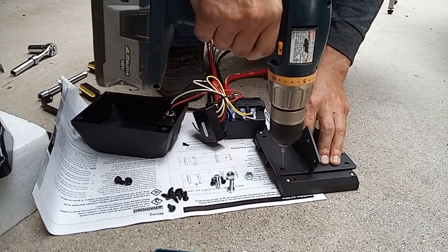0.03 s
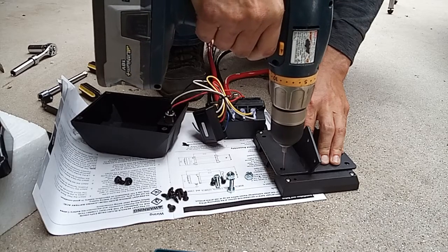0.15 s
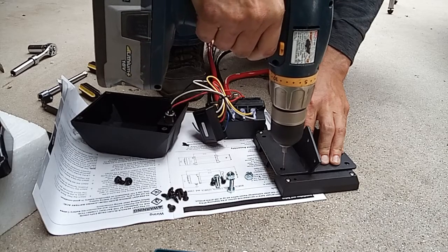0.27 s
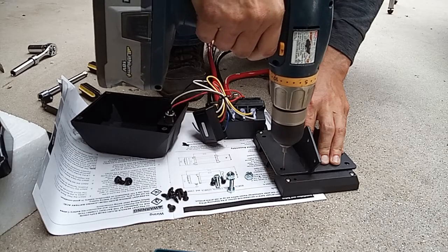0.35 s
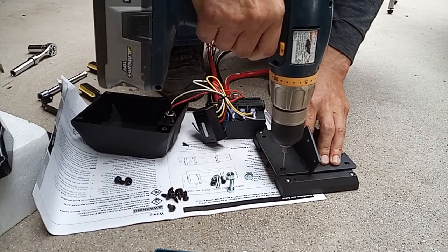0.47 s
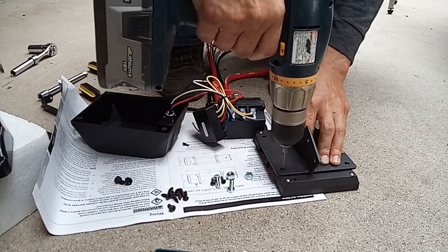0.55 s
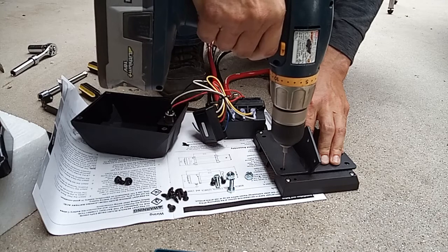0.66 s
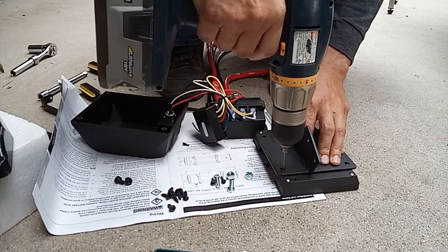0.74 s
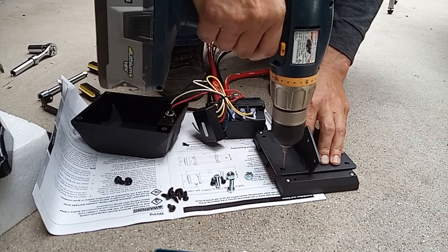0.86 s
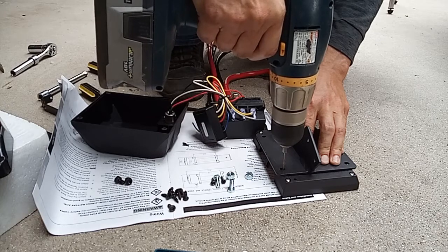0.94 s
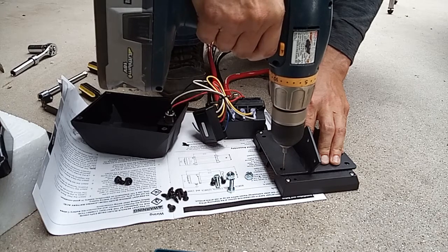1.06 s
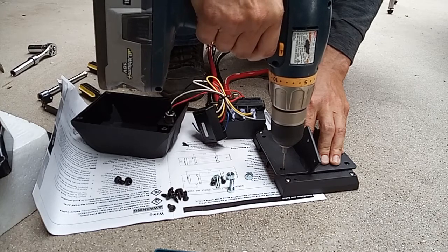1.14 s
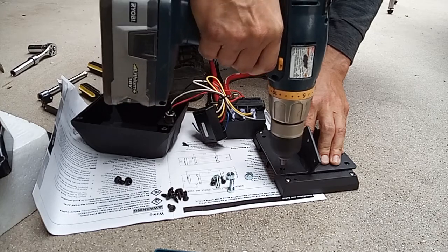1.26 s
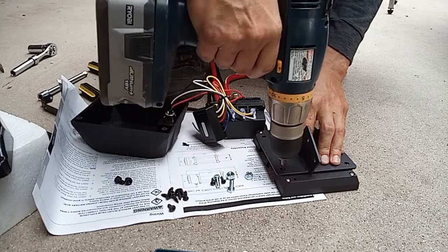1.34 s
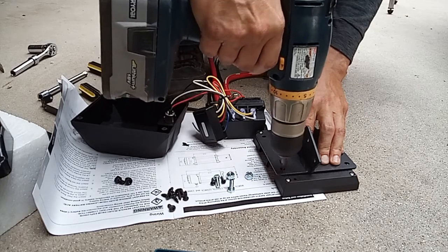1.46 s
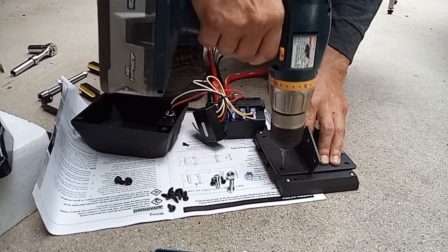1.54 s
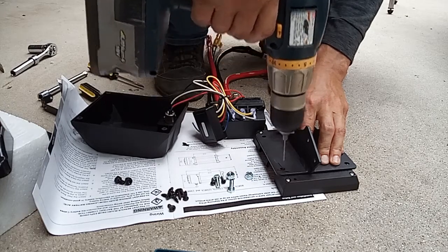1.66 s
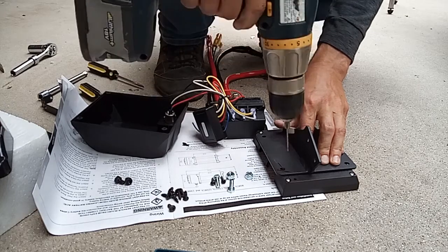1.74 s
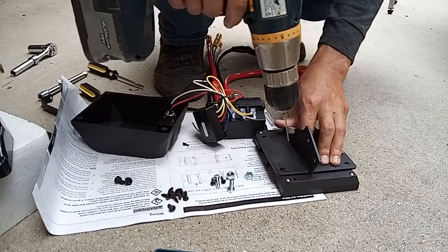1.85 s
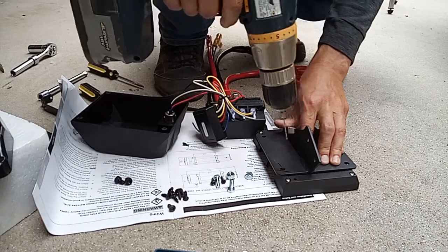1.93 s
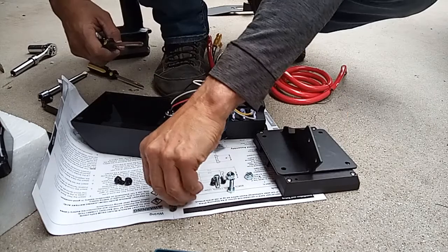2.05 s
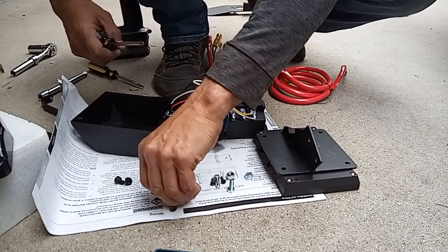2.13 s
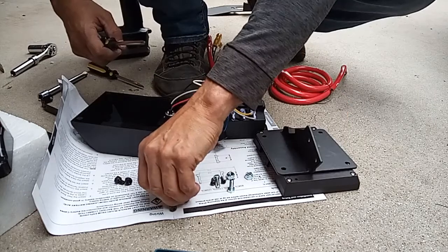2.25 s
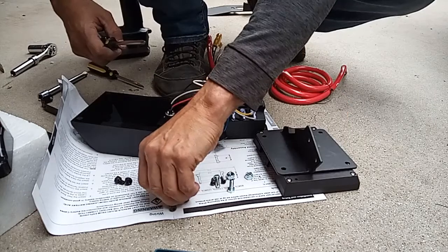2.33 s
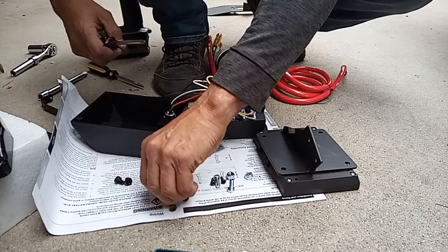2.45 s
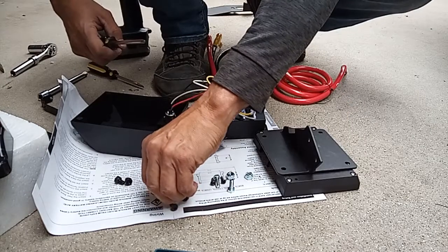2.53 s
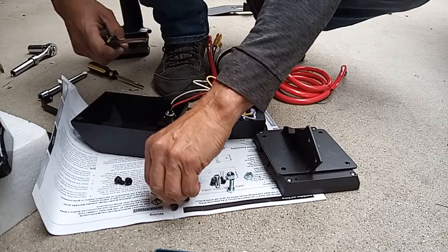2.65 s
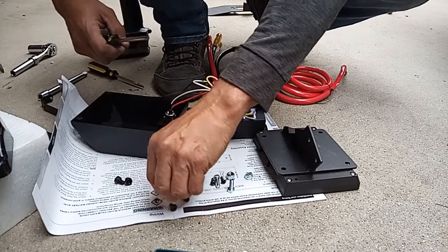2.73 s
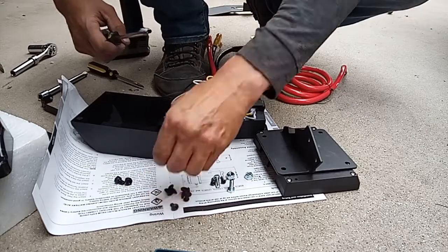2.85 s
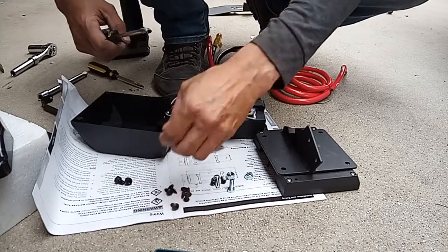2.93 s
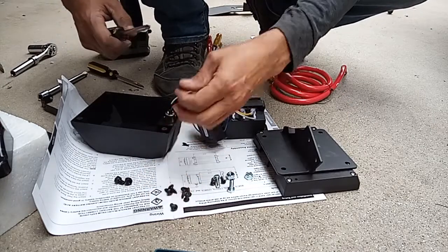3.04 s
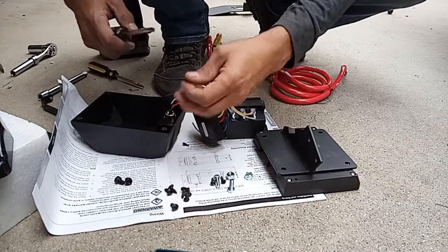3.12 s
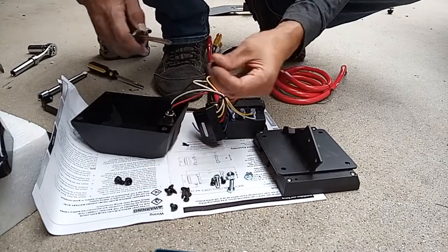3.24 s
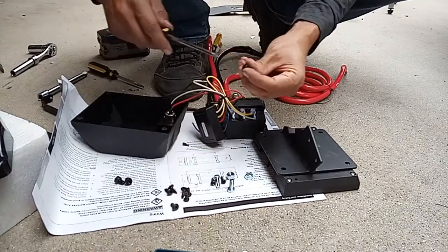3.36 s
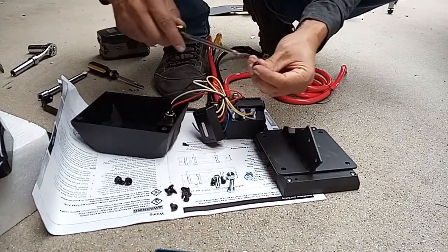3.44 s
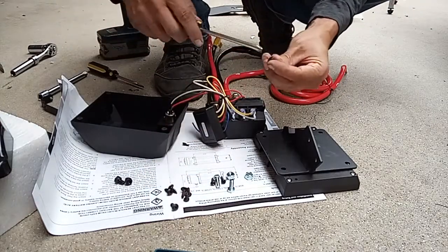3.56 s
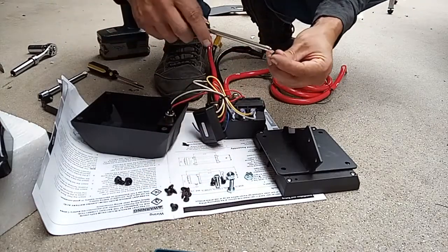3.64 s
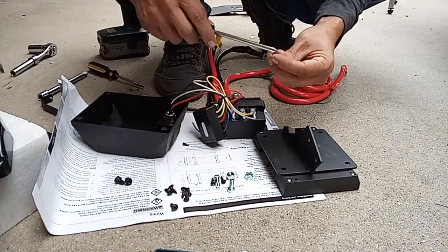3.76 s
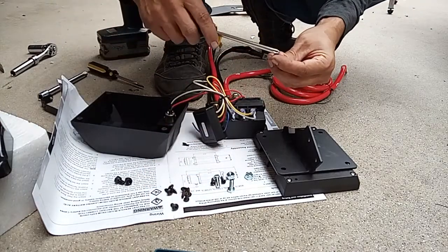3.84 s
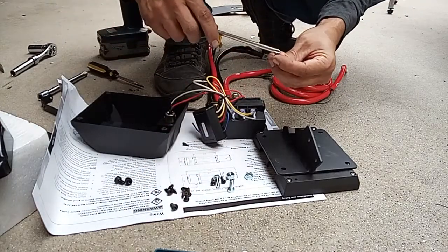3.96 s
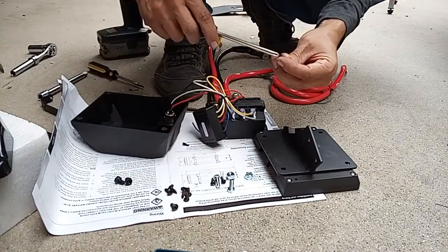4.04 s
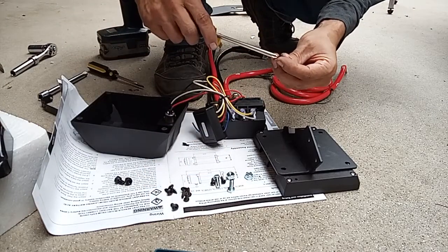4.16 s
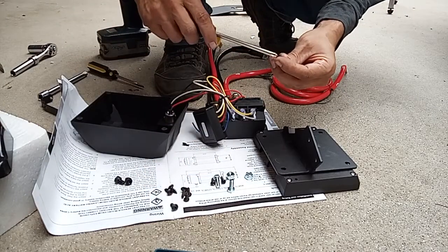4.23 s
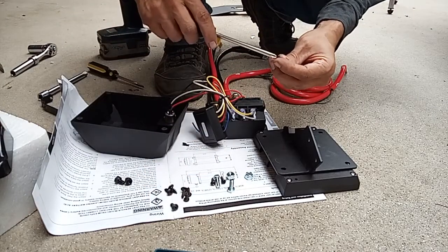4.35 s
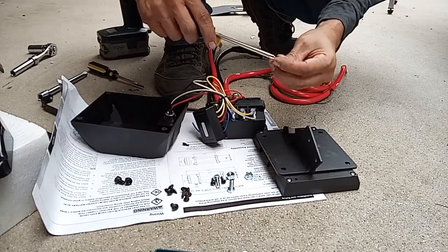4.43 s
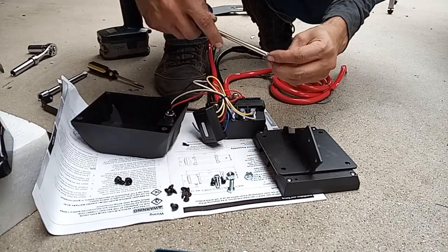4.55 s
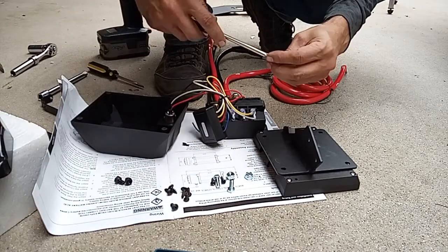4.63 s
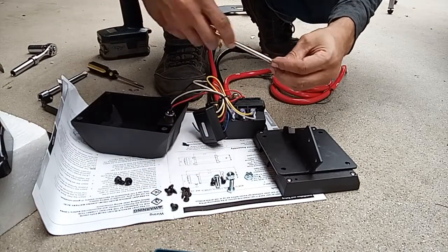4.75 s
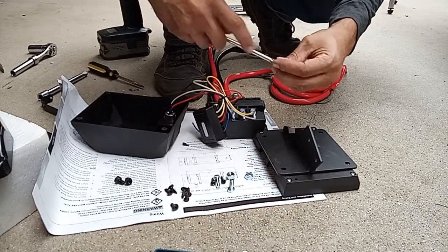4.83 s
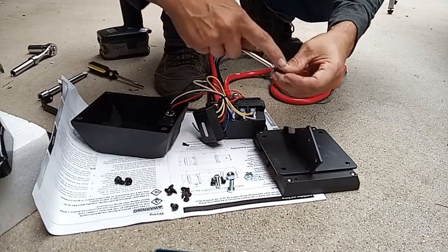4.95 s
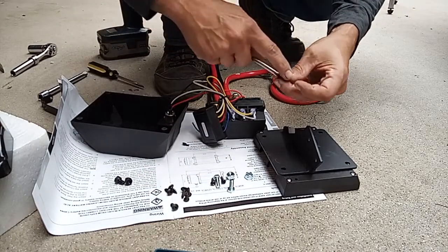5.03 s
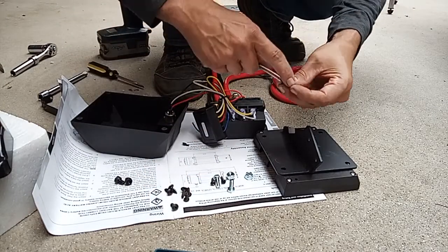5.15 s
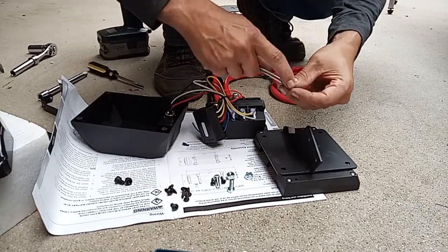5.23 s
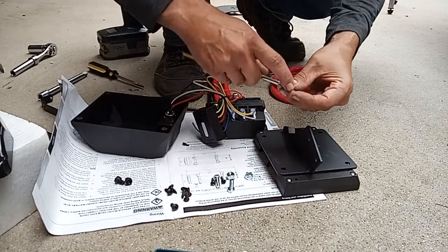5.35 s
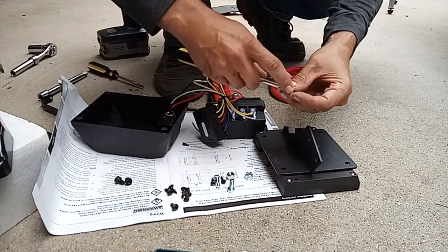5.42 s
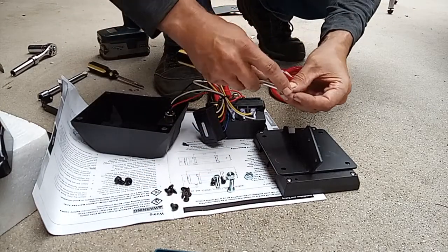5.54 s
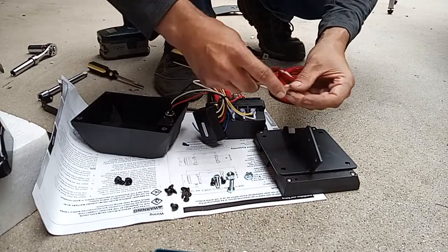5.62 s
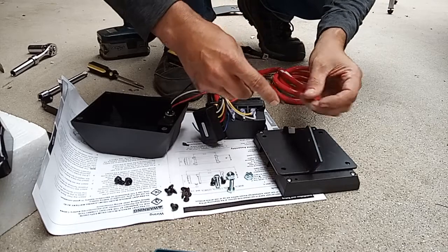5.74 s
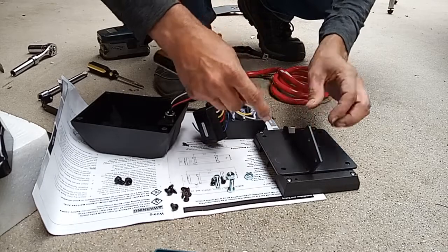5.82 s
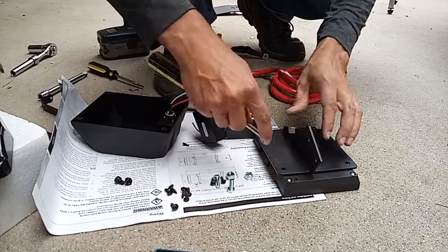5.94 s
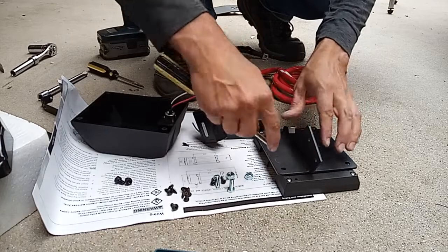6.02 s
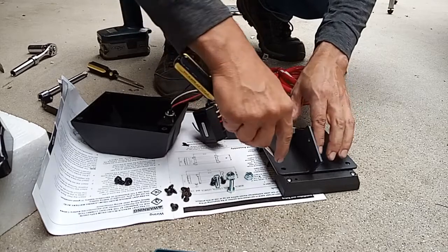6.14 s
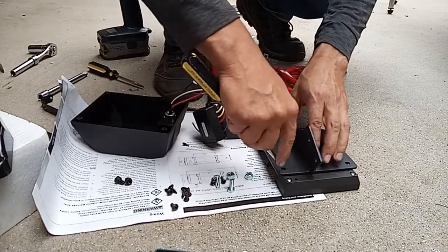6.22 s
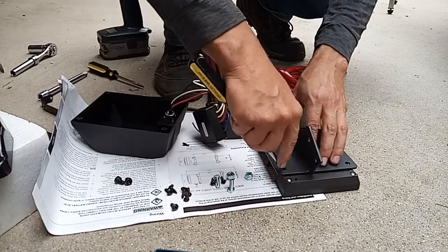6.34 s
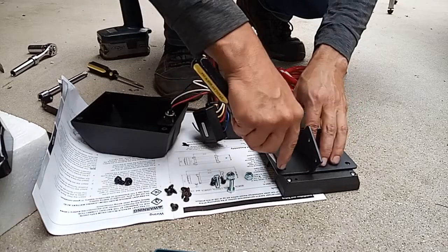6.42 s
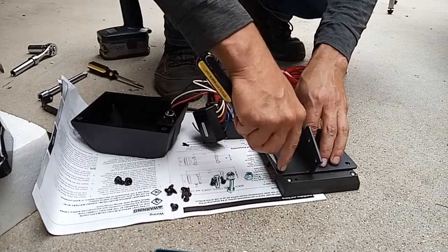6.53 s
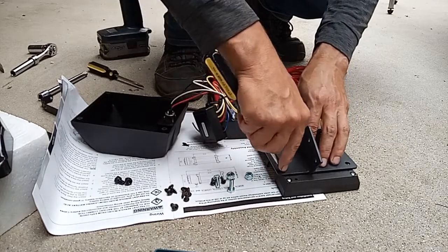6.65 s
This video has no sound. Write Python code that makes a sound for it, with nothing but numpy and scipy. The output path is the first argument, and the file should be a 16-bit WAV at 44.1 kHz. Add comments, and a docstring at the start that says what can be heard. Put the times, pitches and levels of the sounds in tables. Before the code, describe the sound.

A cordless drill is already running close to the microphone, its harsh whine rising as it bores metal with thin squeals. It snags, speeds up briefly, then stops dead with a sharp clack and tiny chuck rattle. Afterwards it is much quieter outdoors: birds chirp, distant traffic rumbles, and small steel parts tick in the hands.

```python
"""A cordless drill bores into a metal bracket on a concrete patio, close to a mono microphone.
Its motor whines on multiples of the shaft speed over coloured noise from fan and brushes.
The bit squeals in gliding sine tones; noise bursts make the clack of the stop and a short rattle.
Then small metal parts tick in the hands as ringing modes and rub as grainy noise.
Outdoors, birds sing in sliding tones; rumble, traffic and a hollow wandering band are shaped noise."""
import sys
import numpy as np
from scipy import signal
from scipy.fft import rfft, irfft, next_fast_len
from scipy.io import wavfile
from scipy.ndimage import uniform_filter1d

SR = 44100
rng = np.random.default_rng(int(sys.argv[2]) if len(sys.argv) > 2 else 0)


def transcribe(u):
    """Save the signal u as a 16-bit wav file named by the first command-line argument.

    u: samples, shape (n,) or (channels, n), limited to [-1, 1]; the rate is SR.
    q: integer samples, one column per channel.
    """
    v = np.clip(np.atleast_2d(u).T, -1, 1)
    q = np.round(v * 32767).astype(np.int16)
    wavfile.write(sys.argv[1], SR, q)


N = 294791
T = np.arange(N) / SR  # time in s

# colour of the rushing air and brushes, which the housing also gives the overtones: [f/Hz, level/dB]
HOUSING_COLOUR = [(40, -26.5), (200, -10), (400, -13), (520, 3.5), (700, 8), (1050, 8), (1300, 3.5),
                  (1450, 7), (1900, 7), (2300, 3), (2600, 8), (3300, 1), (4100, 8.5), (4700, 4), (5500, 5),
                  (6600, 9), (8100, 0), (10300, 8.5), (11500, 8), (12700, 4), (13800, -0.5), (14700, 7),
                  (15500, -5)]
CRUISE_HZ = 205  # shaft speed at which the motor's levels are set
BREAKTHROUGH_S = 1.196  # the bit snags as it breaks through
COMMUTATOR_ORDER = 5  # segments per turn of the shaft


def undb(db):
    """Decibels to gain."""
    return 10 ** (np.asarray(db) / 20)


def unit(x):
    """Scale to rms 1."""
    return x / np.sqrt(np.mean(x ** 2))


def curves(table):
    """The columns of a table, joined by straight lines in time."""
    s, *columns = np.transpose(table)
    return [np.interp(T, s, c) for c in columns]


def colour(x, points):
    """Filter by a spectrum of [f/Hz, level/dB] points; rms 1."""
    hz, db = np.transpose(points)
    size = next_fast_len(len(x))
    bins = np.maximum(np.arange(size // 2 + 1) * SR / size, 1)
    gain = undb(np.interp(np.log(bins), np.log(hz), db))
    return unit(irfft(rfft(x, size) * gain, size)[:len(x)])


def noise(points):
    """Coloured noise of rms 1."""
    return colour(rng.standard_normal(N), points)


def lowpass(x, hz):
    """Second-order treble roll-off."""
    return signal.sosfilt(signal.butter(2, min(hz, .45 * SR), fs=SR, output="sos"), x)


def walk(rate):
    """Chance values, about `rate` a second, joined by straight lines; rms 1."""
    k = max(int(SR / rate), 1)
    steps = np.repeat(rng.standard_normal(N // k + 1), k)
    return unit(uniform_filter1d(steps, k)[:N])


def add(out, s, x):
    """Mix a sound in at time s."""
    i = int(s * SR)
    x, i = x[max(-i, 0):], max(i, 0)
    out[i:i + len(x)] += x[:N - i]


def echoes(x, t60, treble_t60, wet_db, delay):
    """Add scattered reflections whose treble dies sooner."""
    t = T[:SR]
    scatter = rng.standard_normal(SR)
    low = lowpass(scatter, 4900)
    treble = scatter - low
    tail = (low * undb(-60 * t / t60) + treble * undb(-60 * t / treble_t60)) * (t > delay)
    return x + undb(wet_db) * signal.fftconvolve(x, tail / np.linalg.norm(tail))[:N]


def shaft():
    """Speed under load in Hz, the speed with the brake, and the turns made so far."""
    # the motor slows and speeds up with the load: [t/s, shaft speed/Hz]
    speed_table = [(0.0, 158.2), (0.15, 166.4), (0.272, 170.5), (0.312, 173.6), (0.378, 175.9),
                   (0.558, 188.0), (0.604, 193.8), (0.694, 198.7), (0.816, 203.1), (0.932, 205.3),
                   (1.198, 205.3), (1.336, 214.1), (1.39, 213.8), (1.502, 200.4), (1.562, 197.1),
                   (1.708, 211.4), (1.778, 215.3), (1.81, 211.6)]
    brake_hz_per_s = 1106  # bites at the end of the curve
    shudder = np.where(T < BREAKTHROUGH_S, .00044, .0012)  # share of the speed
    speed, = curves(speed_table)
    braked = np.maximum(speed - brake_hz_per_s * np.maximum(T - speed_table[-1][0], 0), 0)
    turns = np.cumsum(braked * (1 + shudder * walk(150))) / SR
    return speed, braked, turns


def tone(turns, order, db):
    """A sine on a multiple of the shaft speed, which follows each change of speed."""
    return np.sqrt(2) * undb(db) * np.sin(2 * np.pi * (order * turns + rng.random()))


def whines(turns):
    """Commutator, pinion and other whines sing on fixed multiples of the shaft speed."""
    # commutator: [t/s, level/dB]
    commutator_level = [(0, -43.5), (0.3, -47.5), (0.6, -45.0), (0.9, -46.4), (1.1, -48.2), (1.22, -50.9),
                        (1.35, -46.7), (1.45, -47.6), (1.56, -45.8), (1.8, -52.4)]
    # pinion, strong at the start and as the bit comes out: [t/s, level/dB]
    pinion_level = [(0, -46.5), (.25, -51.5), (.37, -47.5), (.57, -49.5), (.65, -51.5), (1.52, -52),
                    (1.68, -48), (1.8, -44)]
    # lower whine, which sets in with the high one and holds: [t/s, level/dB]
    low_whine_level = [(0, -62), (.42, -58), (.6, -51.5), (1.2, -51), (1.4, -49.5), (1.8, -54)]
    # high whine, which sets in as the motor gets up to speed: [t/s, level/dB]
    whine_level = [(0, -73), (.36, -61), (.49, -47.5), (.62, -48.5), (.9, -47), (1.2, -50), (1.33, -53),
                   (1.56, -44.5), (1.8, -53)]
    # upper whine: [t/s, level/dB]
    upper_whine_level = [(0, -67), (0.14, -80), (0.3, -56), (0.42, -61.5), (0.52, -46.5), (0.65, -54),
                         (0.85, -60), (1.1, -48.5), (1.3, -48.5), (1.45, -55), (1.56, -66), (1.75, -53)]
    # thin top whine, which sings under full load: [t/s, level/dB]
    top_whine_level = [(0, -68.2), (0.35, -50.2), (0.49, -57.3), (0.58, -45.0), (0.75, -45.7), (1.0, -45.6),
                       (1.18, -46.4), (1.3, -54.9), (1.45, -53.7), (1.56, -53.3), (1.8, -55.1)]
    # a clear 4.1 kHz whine, 20 times the shaft speed: [t/s, level/dB]
    clear_whine_level = [(0, -63), (.3, -60), (.6, -66), (.78, -54), (.9, -46), (1.08, -47), (1.17, -53),
                         (1.25, -66), (1.8, -62)]
    tones = [(COMMUTATOR_ORDER, commutator_level), (12, pinion_level), (15, low_whine_level),
             (25, whine_level), (30, upper_whine_level), (65, top_whine_level), (20, clear_whine_level)]
    out = sum(tone(turns, order, curves(level)[0] + 1.5 * walk(40)) for order, level in tones)
    # the commutator's tone is rough: part of it shakes in strength
    out += tone(turns, COMMUTATOR_ORDER, curves(commutator_level)[0] - 8) * walk(170)
    return out


def overtones(speed, turns):
    """Higher multiples of the shaft speed, which swell and fade as they glide across resonances."""
    # at cruising speed and full load: [multiple of the shaft speed, level/dB]
    overtone_table = [(13, -58.3), (23, -56.2), (33, -56), (35, -48.5), (37, -56), (40, -55.5), (44, -57),
                      (45, -47.8), (47, -51.2), (48, -53), (50, -49), (52, -50.2), (55, -55), (57, -55.8),
                      (58, -50), (59, -52.5), (60, -53.5), (63, -51), (68, -55.5), (70, -56), (71, -57),
                      (72, -56.5), (74, -60), (75, -60)]
    # change with the load: [t/s, level/dB]
    load_table = [(0, -14), (.4, -12), (.6, -7), (.85, -1.5), (1.2, -1.5), (1.3, -8), (1.56, -9), (1.8, -8)]
    ripple_db, ripple_spacing_hz = 3, 600  # each overtone scales the spacing by chance
    load_db, = curves(load_table)
    # they flicker more once the bit snags
    flicker_db = np.where(T < BREAKTHROUGH_S, 2, 3.5)

    def housing_db(hz):
        """The housing's colour at one pitch."""
        return np.interp(hz, *np.transpose(HOUSING_COLOUR))

    out = np.zeros(N)
    for order, db in overtone_table:
        glide_hz = order * (speed - CRUISE_HZ)
        ripple = ripple_db * np.sin(2 * np.pi * glide_hz / ripple_spacing_hz * rng.standard_normal())
        housing = housing_db(order * speed) - housing_db(order * CRUISE_HZ)
        out += tone(turns, order, db + load_db + housing + ripple + flicker_db * walk(45))
    return out


def turn_rattle(turns):
    """Brushes and teeth meet the same flaws every turn: a comb of weak lines that change in level."""
    comb = sum(tone(turns, order, 4.5 * np.tanh(walk(9))) for order in np.arange(6, 96))
    return colour(comb, [(1200, -1.5), (3500, -1.0), (6500, -0.5), (8200, -7.5), (10000, 4.0),
                         (11700, 6), (13000, 2.5), (13800, 0.5), (14700, 6.5), (15500, -0.5)])


def brush_hiss(braked, turns):
    """The brushes spit over a steady hiss as each commutator segment passes."""
    height_db, scatter_db = 7.5, 3.2  # of a spark over the steady hiss
    decay = .12  # share of a segment
    segment, since = np.divmod(COMMUTATOR_ORDER * turns, 1)
    spark_db = height_db + scatter_db * rng.standard_normal(N)[segment.astype(int)]
    spit = 1 + undb(spark_db) * np.exp(-since / decay) * (braked > 0)
    return colour(rng.standard_normal(N) * spit, HOUSING_COLOUR)


def gears():
    """Teeth knock unevenly in their play and ring the gearbox."""
    # ringing modes: [f/Hz, level/dB, t60/s]
    gearbox_modes = [(530, -17, .06), (760, -9, .035), (1120, 0, .04), (1200, -5, .035), (1410, -5, .045),
                     (1590, -8, .03), (2600, -8, .015)]
    knocks_per_s, scatter_db = 130, 5.5
    t = T[:SR // 10]
    ring = sum(undb(db - 60 * t / t60) * np.cos(2 * np.pi * hz * t) for hz, db, t60 in gearbox_modes)
    strength = undb(scatter_db * np.tanh(rng.standard_normal(N)))
    hits = (rng.random(N) < knocks_per_s / SR) * strength
    return unit(signal.fftconvolve(hits, ring)[:N])


def fan_air():
    """Fan noise with the gearbox chattering roughly in its band, louder for a moment at the snag."""
    snag_s, snag_width_s, snag_db = 1.35, .06, 3
    chatter_db = 2.1 * walk(160) + snag_db * np.exp(-((T - snag_s) / snag_width_s) ** 2)
    air = undb(chatter_db) * noise([(200, -30.0), (420, -13.0), (750, -6.0), (1080, 0.0),
                                    (1500, -10.5), (3000, -31.5), (8000, -45.5)])
    # the gears follow the chatter half as far
    return air + undb(2.5 + chatter_db / 2) * gears()


def motor():
    """Tones on the turning shaft and a rush that grows with its speed, both cut off by the brake."""
    stop_s, stop_db_per_s = 1.816, 455.5
    ease_from_s, ease_s, ease_db = 1.455, 0.28, -0.5  # the rush eases once the bit is through
    speed, braked, turns = shaft()
    octaves = np.log2(speed / CRUISE_HZ)
    brushes = undb(-5.5) * brush_hiss(braked, turns) + undb(-8.5) * turn_rattle(turns)
    # level at cruising speed in dB, then its change in dB per octave of speed
    rush = undb(-35 + 9.8 * octaves + 0.89 * walk(60)) * brushes
    rush += undb(-50 + 12 * octaves) * fan_air()
    easing = undb(ease_db * np.clip((T - ease_from_s) / ease_s, 0, 1))
    braking = undb(-stop_db_per_s * np.maximum(T - stop_s, 0))
    return (whines(turns) + overtones(speed, turns) + rush * easing) * braking


def bit():
    """Stick-slip at the tip locks onto a bending mode, which wavers and jumps as the pressure changes."""
    # squeals: [t/s, length/s, start f/Hz, end f/Hz, waver/Hz, level/dB]
    squeal_table = [(-.04, .33, 4010, 3995, 6, -45), (.27, .14, 3860, 3930, 45, -46),
                    (.29, .13, 3470, 3500, 12, -52), (.38, .17, 3790, 3736, 20, -50),
                    (.53, .12, 3840, 3950, 45, -47), (.6, .24, 4070, 4085, 32, -47.5),
                    (1.19, .17, 3900, 3850, 20, -44.5), (1.57, .23, 3920, 3830, 30, -47.5)]
    out, waver = np.zeros(N), walk(220)
    for s, length, start_hz, end_hz, waver_hz, db in squeal_table:
        n = int(length * SR)
        hz = np.linspace(start_hz, end_hz, n) + waver_hz * waver[:n]
        squeal = np.sqrt(2) * np.sin(2 * np.pi * np.cumsum(hz) / SR)
        add(out, s, undb(db) * signal.windows.tukey(n, .25) * squeal)
    return out * undb(1.7 * walk(60.45))


def patchy(points, patchy_db, rate):
    """Noise whose narrow bands swell and fade alone, as over a long way through moving air."""
    edges = np.geomspace(200, 3200, 17)  # Hz
    white = rng.standard_normal(N)
    out = white.copy()
    for lo, hi in zip(edges, edges[1:]):
        band_filter = signal.butter(2, [lo, hi], "band", fs=SR, output="sos")
        band = signal.sosfiltfilt(band_filter, white)
        out += band * (undb(patchy_db * walk(rate)) - 1)
    return colour(out, points)


def traffic():
    """Distant traffic slowly recedes, its bands patchy."""
    # spectrum: [f/Hz, level/dB]
    traffic_colour = [(200, -12.5), (350, -1), (520, 0.5), (680, -1.5), (1000, -3), (1400, -4),
                      (2000, -11.5), (3500, -27.5), (8000, -29.5)]
    start_db, fade_db_per_s = -65, 0.87
    return undb(start_db - fade_db_per_s * T) * patchy(traffic_colour, patchy_db=3.5, rate=11)


def swell():
    """A narrow hollow band of noise swells and fades while its centre wanders."""
    # [t/s, centre f/Hz, level/dB]
    swell_table = [(0, 850, -84), (2.1, 900, -67.5), (2.27, 850, -75), (2.55, 830, -63), (2.72, 1000, -67),
                   (2.86, 950, -75), (3.03, 860, -63.5), (3.3, 820, -61.5), (3.66, 850, -72.5),
                   (3.83, 920, -63), (3.96, 880, -70), (4.12, 950, -61), (4.3, 860, -65),
                   (4.58, 830, -69.5), (4.78, 900, -80.5), (5.4, 1050, -72.5), (5.9, 950, -78.5),
                   (6.68, 920, -76)]
    width_hz = 146
    hz, db = curves(swell_table)
    spread = lowpass(rng.standard_normal(N) + 1j * rng.standard_normal(N), width_hz / 2)
    # the carrier shifts the slow noise up to the centre pitch
    return undb(db) * unit(np.real(spread * np.exp(2j * np.pi * np.cumsum(hz) / SR)))


def air_rumble():
    """Deep rumble of the air and a distant low drone: bass noise of unsteady level."""
    # rumble: [t/s, level/dB]
    rumble_level = [(0, -59), (.85, -66.5), (1.33, -54), (1.6, -66.5), (2.2, -61.5), (2.7, -64),
                    (3.9, -66.5), (4.35, -55.5), (4.95, -65.5), (5.4, -61), (5.7, -65), (6.2, -63),
                    (6.68, -68.5)]
    # rumble spectrum: [f/Hz, level/dB]
    rumble_colour = [(15, -70), (28, -42), (45, -12), (70, -3.5), (100, 3.5), (140, -6), (280, -23.5),
                     (900, -60), (4000, -100)]
    # drone, before a 1 dB cut: [t/s, level/dB]
    drone_level = [(0, -60), (.75, -58), (.95, -53), (1.75, -50.5), (2.1, -63), (2.5, -53), (2.75, -58.5),
                   (3.08, -52.5), (3.35, -59.5), (3.55, -53.5), (3.9, -59), (4.3, -56.5), (5.25, -59),
                   (5.65, -61.5), (6.1, -63), (6.68, -66.5)]
    # drone spectrum: [f/Hz, level/dB]
    drone_colour = [(20, -70), (105, -5.5), (150, 3), (205, -4.5), (280, -14.5), (420, -31), (900, -55),
                    (4000, -100)]
    rumble = undb(curves(rumble_level)[0] + 2.6 * walk(14)) * noise(rumble_colour)
    drone = undb(curves(drone_level)[0] - 1 + 2.2 * walk(14)) * noise(drone_colour)
    return rumble + drone


def puffs():
    """Puffs of air buffet the microphone: single bass pulses about one cycle long."""
    # [t/s, f/Hz, peak level/dB]
    puff_table = [(1.933, 135, -41), (4.293, 132, -46), (4.367, 79.4, -40), (4.586, 93, -33.5),
                  (4.603, 126, -37.5), (4.76, 99, -39), (4.788, 152, -26), (5.228, 130, -47.5),
                  (6.222, 113, -45.5)]
    out = np.zeros(N)
    for s, hz, db in puff_table:
        cycles = (T - s) * hz
        out += undb(db) * np.exp(-(cycles / 0.57) ** 2) * np.cos(2 * np.pi * cycles)
    return out


def hoots():
    """A hollow tone comes and goes: noise in a narrow band."""
    # [t/s, length/s, level/dB]
    hoot_table = [(1.986, 0.17, -66.5), (2.446, 0.12, -68), (2.8, 0.22, -72.5), (3.778, 0.3, -66)]
    # spectrum: [f/Hz, level/dB]
    hoot_colour = [(300, -62), (450, -23), (520, 1), (600, -41), (900, -64)]
    out, hollow = np.zeros(N), noise(hoot_colour)
    for s, length, db in hoot_table:
        n, i = int(length * SR), int(s * SR)
        add(out, s, undb(db) * signal.windows.tukey(n, .5) * hollow[i:i + n])
    return out


def outdoors():
    """Air, traffic and hollow bands of noise around the patio, over a faint steady hiss."""
    # hiss spectrum: [f/Hz, level/dB]
    floor_colour = [(1000, 3), (3000, 4.5), (6800, 0.5), (8200, -17), (13500, -15), (14800, -3.5),
                    (16000, -2.5)]
    floor = undb(-75) * noise(floor_colour)
    return air_rumble() + traffic() + swell() + floor + puffs() + hoots()


def knocks():
    """The brake locks the gearbox in quick blows on the damped housing; handling knocks follow."""
    # [t/s, level/dB, brightest f/Hz, t60/s]
    clack_table = [(1.817, -27, 1710, 0.017), (1.8193, -23, 6050, 0.028), (1.8235, -22, 14100, 0.018),
                   (1.826, -29, 12000, 0.017), (1.828, -38.5, 6000, 0.17), (1.8395, -38, 3000, 0.025),
                   (1.878, -50, 1500, 0.14), (2.086, -64, 1220, 0.077), (5.203, -61, 1800, 0.07)]
    # spectrum: [f/Hz, level/dB]
    clack_colour = [(40, -25.5), (120, -32.5), (250, 5), (380, -21), (510, 2.5), (900, 2), (1400, 0.5),
                    (2200, -3.5), (6000, -5), (15000, -11)]
    out, t = np.zeros(N), T[:SR // 4]
    for s, db, bright_hz, t60 in clack_table:
        blow = unit(lowpass(colour(rng.standard_normal(len(t)), clack_colour), bright_hz))
        add(out, s, undb(db - 60 * t / t60) * blow)
    return out


def chuck():
    """The chuck rattles in its play as it comes to rest: uneven small knocks that weaken overall."""
    # spectrum of a knock: [f/Hz, level/dB]
    chuck_colour = [(300, -18), (1100, 2), (1800, -14.5), (2550, 8), (3100, -5.5), (3600, 10), (4200, 0),
                    (5400, 3.5), (6300, 3), (8200, -14.5), (10000, -0.5), (13500, -17), (15500, -6.5)]
    start, end, count = 1.832, 1.897, 7  # s, s, knocks
    start_db, fade_db_per_s, t60 = -43, 171.5, 0.027
    out, t = np.zeros(N), T[:SR // 20]
    for k, (early, size) in enumerate(rng.random(size=(count, 2))):
        after = (end - start) * (k + early) / count
        db = start_db - fade_db_per_s * after + 8 * (size - .5)
        knock = colour(rng.standard_normal(len(t)), chuck_colour)
        add(out, start + after, undb(db - 60 * t / t60) * knock)
    return out


def birds():
    """Gliding whistles, short chirps and fast, uneven trills from the trees."""
    # short chirps, all of one length: [t/s, start f/Hz, end f/Hz, level/dB]
    chirp_table = [(1.856, 6060, 4900, -62.5), (2.04, 2324, 2175, -67.5), (2.559, 4350, 5570, -57.5),
                   (2.654, 2330, 2820, -60.5), (2.842, 5680, 4600, -59), (2.908, 2193, 2450, -59.5),
                   (4.034, 4630, 4720, -68.5), (4.597, 6100, 6800, -59), (4.894, 4860, 4716, -56),
                   (5.115, 5070, 4620, -69)]
    # buzzing trills, depth scaling the flutter: [t/s, length/s, start f/Hz, end f/Hz, depth/Hz, level/dB]
    trill_table = [(1.903, 0.048, 3400, 3580, 219, -62.5), (1.925, 0.026, 4600, 4530, 200, -69),
                   (1.93, 0.04, 2830, 2560, 150, -69), (1.976, 0.062, 4770, 4850, 380, -71),
                   (2.069, 0.034, 2840, 3080, 300, -70), (2.112, 0.13, 7200, 6800, 200, -77.5),
                   (2.43, 0.18, 6880, 7220, 50, -73), (2.609, 0.13, 8000, 7900, 300, -68.5),
                   (2.687, 0.19, 8050, 7730, 380, -60), (2.848, 0.1, 7620, 7650, 200, -67),
                   (2.714, 0.041, 4900, 3400, 497, -61.5), (3.44, 0.062, 7200, 7000, 250, -70.5),
                   (3.736, 0.1, 3350, 3350, 714, -67), (3.809, 0.034, 4610, 4900, 368, -57),
                   (3.994, 0.068, 4190, 2950, 380, -63.5), (4.594, 0.089, 7460, 7560, 81, -63),
                   (4.675, 0.15, 5020, 5450, 398, -59.5), (4.782, 0.13, 5750, 5320, 375, -51),
                   (5.395, 0.32, 5130, 4920, 286, -63), (5.746, 0.059, 4560, 3310, 684, -68.5),
                   (5.754, 0.24, 4980, 5035, 125, -60.5), (6.226, 0.072, 5930, 7120, 440, -69)]
    # thin pure whistles: [t/s, length/s, start f/Hz, end f/Hz, level/dB]
    whistle_table = [(2.918, .08, 10200, 9800, -86), (2.98, 0.12, 9950, 10500, -86),
                     (3.147, .16, 10560, 11000, -87.5), (3.433, 0.061, 6270, 6390, -65.5),
                     (4.394, 0.32, 4320, 4175, -70), (4.46, 0.22, 1786, 1698, -72.5),
                     (4.658, 0.224, 4240, 4053, -60.5), (4.992, 0.11, 3630, 3860, -63.5),
                     (5.196, 0.067, 3590, 3640, -70.5), (5.267, 0.077, 3685, 3715, -60)]
    chirp_s, chirp_bend = 0.077, 2.3  # a chirp slides fast, then levels off; bend 1 is straight
    chirp_flutter, whistle_flutter = 0.03, 0.0063  # depth as a share of the starting pitch
    octave_db = -29.5  # second harmonic of every note
    out = np.zeros(N)
    flutter_hz = 110 + 45 * walk(60)
    flutter = 0.68 * np.sin(2 * np.pi * np.cumsum(flutter_hz) / SR) + 0.72 * walk(600)

    def sing(s, length, start_hz, end_hz, depth_hz, db, bend=1):
        """One note: a slide with a flutter on it."""
        n, i = int(length * SR), int(s * SR)
        slide = end_hz + (start_hz - end_hz) * np.linspace(1, 0, n) ** bend
        phase = 2 * np.pi * np.cumsum(slide + depth_hz * flutter[i:i + n]) / SR
        note = np.sin(phase) + undb(octave_db) * np.sin(2 * phase)
        add(out, s, undb(db) * signal.windows.tukey(n, .6) * note)

    for row in trill_table:
        sing(*row)
    for s, start_hz, end_hz, db in chirp_table:
        sing(s, chirp_s, start_hz, end_hz, chirp_flutter * start_hz, db, bend=chirp_bend)
    for s, length, start_hz, end_hz, db in whistle_table:
        sing(s, length, start_hz, end_hz, whistle_flutter * start_hz, db)
    return echoes(out, t60=0.27, treble_t60=0.24, wet_db=-2.0, delay=0.013)


def ticks():
    """A sharp contact, a short steel ring, a bounce off the concrete and scatter from parts nearby."""
    # steel screw and driver tip touch: [t/s, level/dB, brightest f/Hz]
    tick_table = [(2.0056, -79, 15000), (2.0544, -71, 14000), (3.767, -60, 8000), (3.7722, -52, 9000),
                  (3.7775, -43, 7440), (3.791, -54, 9000), (3.8522, -44.5, 18000), (4.083, -45.5, 18000),
                  (4.1063, -45, 17000), (4.21, -67, 9000), (4.3482, -47, 12700), (4.4418, -47.5, 18000),
                  (4.5141, -46.5, 19000)]
    # their ring, before each contact's scatter: [f/Hz, level/dB, t60/s]
    steel_modes = [(4660, -13, 0.083), (5700, -18, 0.11), (6250, -2, 0.061), (6600, -8, 0.025),
                   (6500, 0, 0.016), (9200, -4, 0.024), (10500, -11, 0.037), (11600, -22.5, .04),
                   (14900, -20, .035)]
    crack_colour = [(1500, -52), (4500, -5), (6500, -7), (8000, 1.5), (9500, 4.5),
                    (13000, -10.0), (15500, 10.0)]
    out, t = np.zeros(N), T[:SR // 4]
    # sharp contact, then the longer scatter
    decay = undb(4.5 - 60 * t / 0.01) + undb(-3.5 - 60 * t / 0.084)
    for s, db, bright_hz in tick_table:
        ring = np.zeros(len(t))
        # every contact lands elsewhere, so the modes change their balance
        for hz, mode_db, t60 in steel_modes:
            level_chance, pitch_chance = rng.standard_normal(2)
            mode_hz = hz * (1 + 0.014 * pitch_chance)
            ring += undb(mode_db + 2.0 * level_chance - 60 * t / t60) * np.sin(2 * np.pi * mode_hz * t)
        crack = colour(rng.standard_normal(len(t)), crack_colour)
        tick = undb(db) * lowpass(undb(-1.0) * ring + decay * crack, bright_hz)
        add(out, s, tick)
        add(out, s + 0.0031, undb(-10.0) * tick)  # the bounce
    # parts this small radiate no bass
    return signal.sosfilt(signal.butter(2, 3200, "high", fs=SR, output="sos"), out)


def rubs():
    """Short, grainy strokes as hands, sleeves and loose parts rub: noise of rough level."""
    # [t/s, length/s, centre f/Hz, level/dB]
    rub_table = [(2.242, 0.088, 1680, -70), (3.26, 0.11, 4300, -79.5), (3.52, 0.13, 2800, -74.5),
                 (4.2, 0.12, 336, -66.5), (5.15, 0.132, 303, -66.5), (5.28, 0.096, 555, -71)]
    out, grain = np.zeros(N), undb(3.7 * walk(150)) * rng.standard_normal(N)
    for s, length, hz, db in rub_table:
        n, i = int(length * SR), int(s * SR)
        band = [(hz / 2, -36), (hz, 0), (hz * 2, -36), (hz * 4, -80)]
        add(out, s, undb(db) * signal.windows.tukey(n, .6) * colour(grain[i:i + n], band))
    return out


def scene():
    """The work sounds echo briefly off the house wall; both channels are alike."""
    work = motor() + bit() + knocks() + chuck() + ticks() + rubs()
    near = echoes(work, t60=.25, treble_t60=.12, wet_db=-15, delay=0.004)
    return np.tile(near + birds() + outdoors(), (2, 1))


def record(dry):
    """The recorder cuts the top steeply above 15850 Hz."""
    return signal.sosfilt(signal.ellip(10, .2, 75, 15850, fs=SR, output="sos"), dry)


dry = scene()
out = record(dry)
transcribe(out)
```